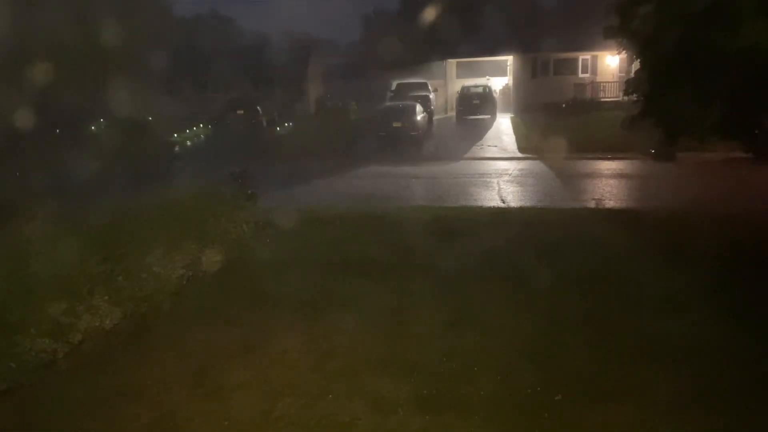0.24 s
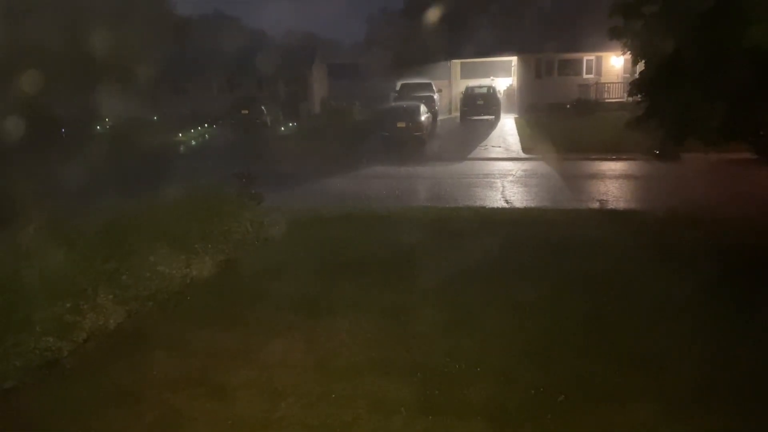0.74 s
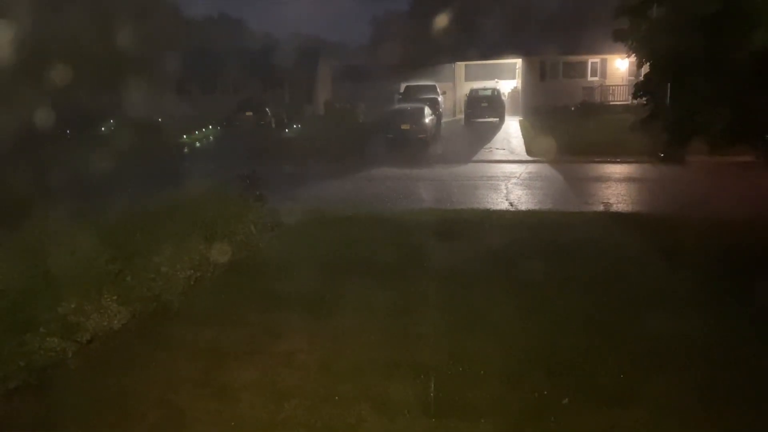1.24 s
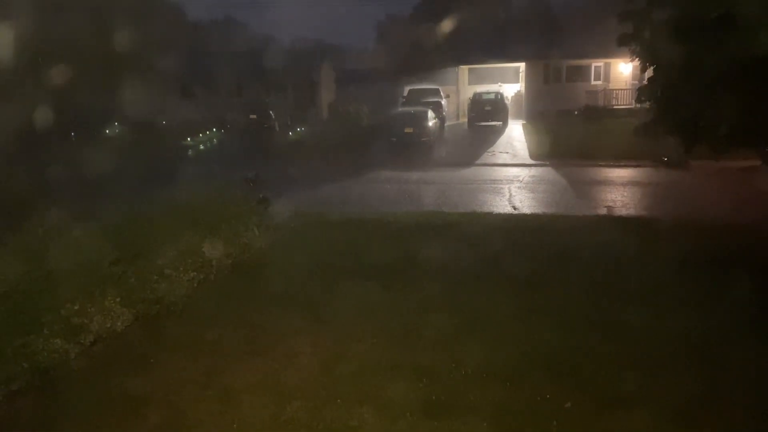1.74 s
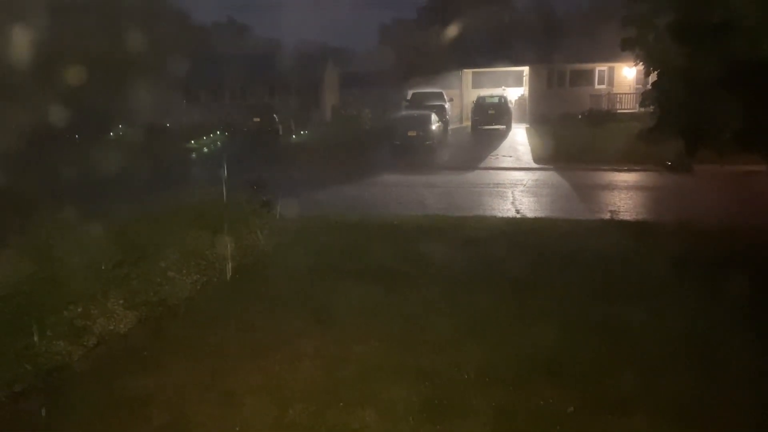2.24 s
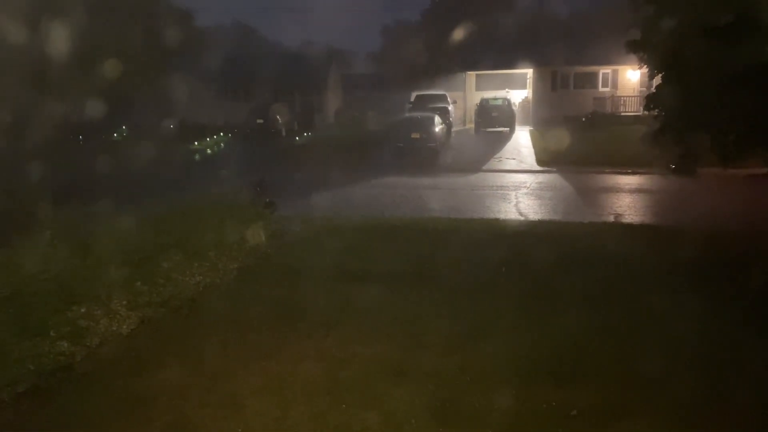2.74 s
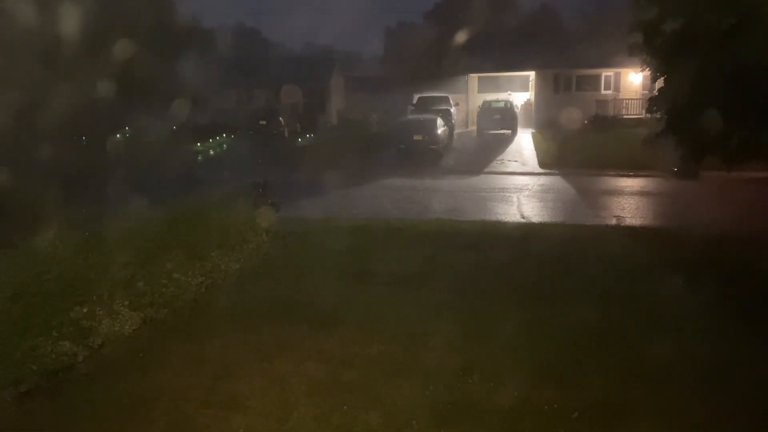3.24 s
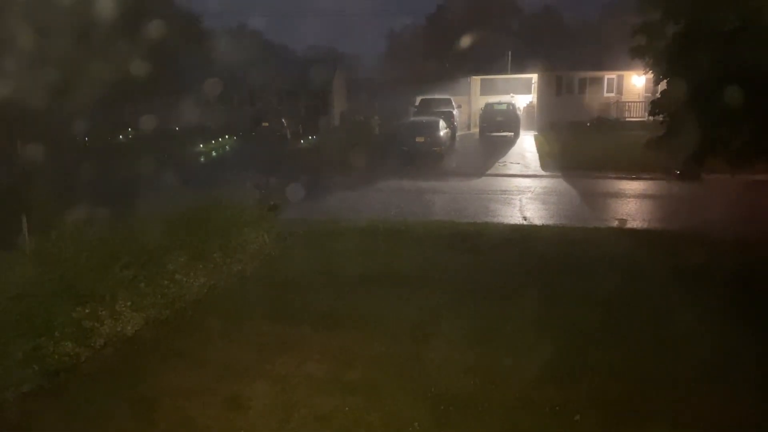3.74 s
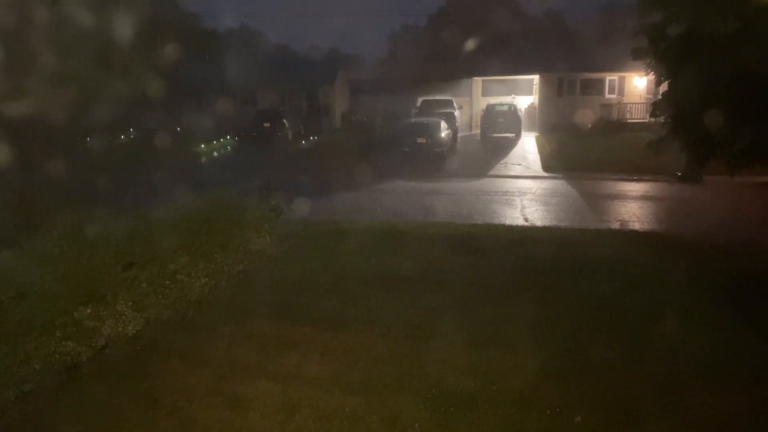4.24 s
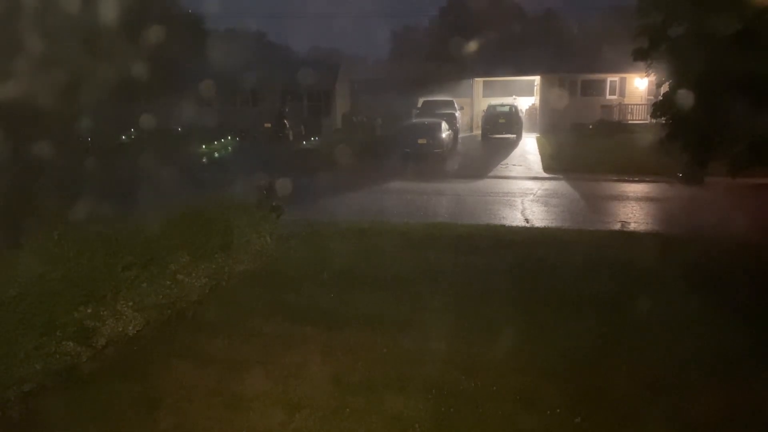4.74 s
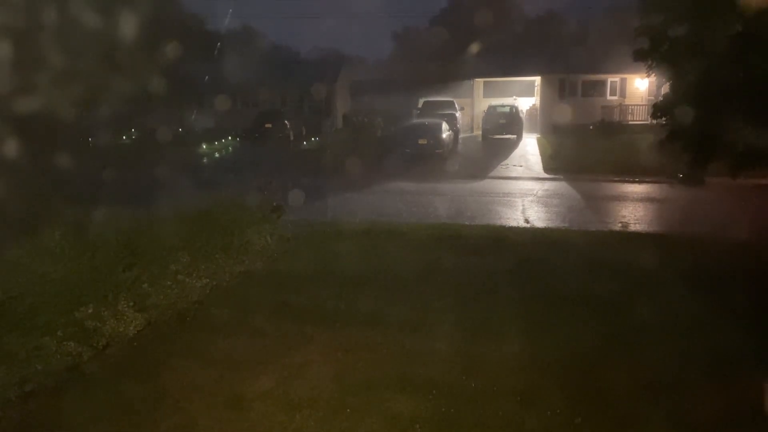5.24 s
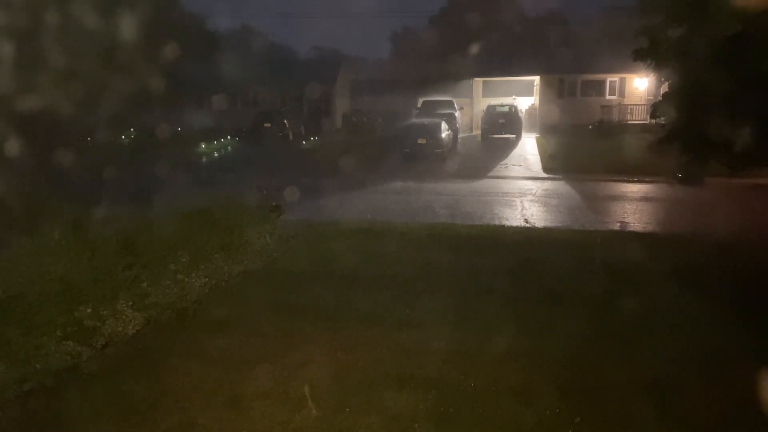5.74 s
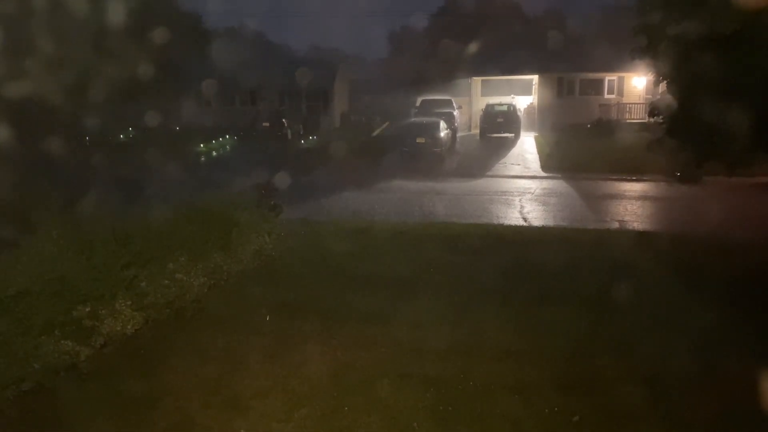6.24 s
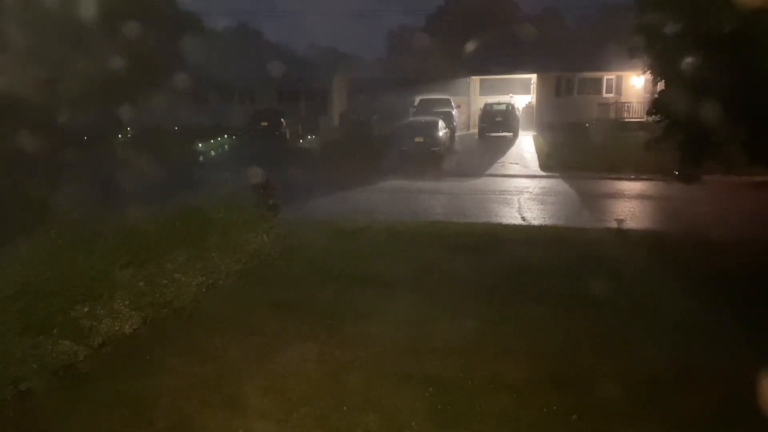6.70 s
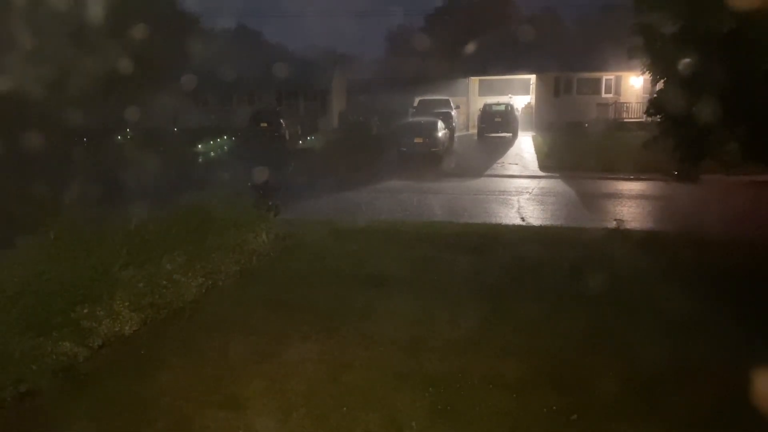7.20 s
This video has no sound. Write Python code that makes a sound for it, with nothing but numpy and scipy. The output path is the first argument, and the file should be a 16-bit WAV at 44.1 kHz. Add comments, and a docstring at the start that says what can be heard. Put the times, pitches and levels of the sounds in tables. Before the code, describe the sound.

Heavy rain at night outside a house window, heard from just inside. A continuous wash of far drops with a thin hiss of spray, nearer patter in irregular flurries, and fat drips from the eaves smacking the sill throughout. Dull plops and light ticks on the pane punctuate it. A low appliance hum stays constant beneath. Stereo phone microphone close to the window.

```python
"""Heavy, steady rain heard from indoors at a window. Far drops merge into a wash of shaped noise, with a thin hiss
of spray from one side; nearer drops ring the window in flurries and patter on several surfaces.
Close by, fat drips from the eaves smack on the sill and splash, among dull plops into standing water,
ticks on the pane, puffs of spray and a few pitched plinks, each a noise burst rung through a resonance.
In the room an appliance motor hums at twice the mains frequency over the noise rumble of its fan."""
import sys
import numpy as np
from scipy import signal
from scipy.fft import rfft, irfft
from scipy.io import wavfile
from scipy.ndimage import uniform_filter1d

SR = 44100
rng = np.random.default_rng(int(sys.argv[2]) if len(sys.argv) > 2 else 0)


def unload_wav(signal):
    """Save mono or channel-first audio to the path in sys.argv[1] as 16-bit WAV at rate SR, clipped to [-1, 1]."""
    wavfile.write(
        sys.argv[1],
        SR,
        np.round(np.clip(np.atleast_2d(signal).T, -1, 1) * 32767).astype(np.int16),
    )


N = 329272  # length in samples


def undb(db):
    """Decibels to gain."""
    return 10 ** (np.asarray(db) / 20)


def along(points, size=N):
    """A (Hz, value) table read at every Fourier bin, on a log-frequency axis."""
    hz, value = np.transpose(points)
    bins_hz = np.fft.rfftfreq(size, 1 / SR)
    return np.interp(np.log(bins_hz + 1), np.log(hz), value)


def colour(x, gain):
    """Filter by a gain for each Fourier bin."""
    return irfft(rfft(x) * gain, x.shape[-1])


def noise(channels=1):
    """White noise of 0 dB per Hz."""
    return rng.standard_normal((channels, N)) * np.sqrt(SR / 2)


def ring(x, hz, width_hz):
    """One resonance, gain 1 at its centre."""
    hz = min(hz, SR / 3)
    b, a = signal.iirpeak(hz, hz / min(width_hz, SR / 4), SR)
    return signal.lfilter(b, a, x)


def pan(lean_db):
    """Left and right gains for a left minus right level difference."""
    return undb(np.array([[1], [-1]]) * lean_db / 2)


def stereo(mid, side, alike):
    """Left and right from two unrelated sounds, with a given correlation."""
    alike = np.clip(alike, -1, 1)
    return np.sqrt((1 + alike) / 2) * mid + np.sqrt((1 - alike) / 2) * np.array([side, -side])


def walk(rate):
    """Random levels held 1 / rate s and smoothed twice; standard deviation 1."""
    k = int(SR / rate)
    steps = np.repeat(rng.standard_normal(N // k + 1), k)
    slow = uniform_filter1d(uniform_filter1d(steps, k), k)[:N]
    return slow / slow.std()


def drops(rate, scatter_db):
    """Impacts at random times, many small and a few large; 0 dB per Hz."""
    when, rank = rng.random((int(rate * N / SR), 2)).T
    sizes = undb(-scatter_db * np.log(rank + 1 / 20))
    hits = np.bincount((when * N).astype(int), sizes, N)
    return hits / hits.std() * np.sqrt(SR / 2)


def splat(hz, width_hz, swell_s, alike, room_db=-22, room_fall_s=0.28):
    """One drop: a noise burst swells, fades and lingers in the room, rung twice through one resonance."""
    t = np.arange(SR // 5) / SR
    age = t / swell_s
    burst_shape = age ** 2 * np.exp(1 - age ** 2)
    # the room's tail falls 64 dB in room_fall_s
    tail = np.minimum(age, 1) * undb(room_db - 64 * t / room_fall_s)
    shape = burst_shape + tail
    burst = rng.standard_normal((2, len(t))) * shape
    mid, side = ring(ring(burst, hz, width_hz), hz, width_hz)
    pair = stereo(mid, side, alike)
    # each side carries, on average, the energy of the envelope
    return pair * np.sqrt(np.sum(shape ** 2) / np.mean(np.sum(pair ** 2, axis=1)))


def add(out, s, sound):
    """Mix a sound in at a time."""
    start = int(np.clip(s * SR, 0, N - 1))
    out[:, start:start + sound.shape[1]] += sound[:, :N - start]


# one gust drives the rain harder: its peak, its build and die-away time, what it adds
GUST_S, GUST_WIDTH_S, GUST_DB = 1.43, 0.24, 1
# the shower strengthens very slowly and wanders about that trend
RISE_DB_PER_S, WANDER_DB, WANDER_PER_S = 0.01, 0.67, 1.5


def rain_strength():
    """Strength of the rain in dB about its mean: a slow rise, one gust and a slight wander."""
    t = np.arange(N) / SR
    gust = GUST_DB * np.exp(-((t - GUST_S) / GUST_WIDTH_S) ** 2)
    db = gust + RISE_DB_PER_S * t + WANDER_DB * walk(WANDER_PER_S)
    return db - db.mean()


# Spectrum of the far rain in the room. Each row: frequency in Hz, level in dB per Hz before flicker.
WASH_SPECTRUM = [(120, -112), (290, -80.5), (450, -84.5), (750, -82), (880, -84), (1200, -85),
                 (1520, -87.5), (1720, -86), (1900, -86), (2400, -90), (3200, -92), (5000, -98.5),
                 (6300, -99.3), (7800, -126)]
# How alike the rain is at the two microphones. Each row: frequency in Hz, correlation from -1 to 1.
LEFT_RIGHT_LIKENESS = [(300, -0.61), (450, 0.32), (750, -0.38), (1130, -0.55), (1480, -0.088), (1850, -0.6),
                       (2150, 0.56), (2700, 0.72), (3200, 0.32), (4500, 0.53), (6000, 0.23)]
# Where the wash leans. Each row: frequency in Hz, left minus right in dB.
WASH_LEAN = [(400, -0.5), (600, -2), (880, .5), (1250, -0.5), (2000, 1.5), (3000, 2.5), (4800, 3.5),
             (6300, -0.5)]


def wash(flow_db, flicker_db=1.0):
    """Far drops merge into a roar whose low and high registers waver on their own."""
    alike = np.clip(along(LEFT_RIGHT_LIKENESS), -1, 1)
    mid, side = colour(noise(channels=2), np.sqrt([(1 + alike) / 2, (1 - alike) / 2]))
    roar = colour(np.array([mid + side, mid - side]), undb(along(WASH_SPECTRUM)) * pan(along(WASH_LEAN)))
    low = signal.sosfiltfilt(signal.butter(2, 1900, fs=SR, output="sos"), roar)
    high = roar - low
    return low * undb(flow_db + flicker_db * walk(14)) + high * undb(flow_db + flicker_db * walk(21.85))


# Spectrum of the fine spray. Each row: frequency in Hz, level in dB per Hz before flicker.
HISS_SPECTRUM = [(4500, -118), (6000, -103), (7000, -98.6), (8400, -102.8), (10800, -103.4),
                 (13000, -107.8), (15500, -112)]
HISS_LAG_S = .000272


def hiss(flow_db, flicker_db=1.4, above_11k_db=0.5):
    """Fine spray off to one side reaches the left microphone a little later; its level flickers quickly."""
    lag = np.exp(-2j * np.pi * np.fft.rfftfreq(N, 1 / SR) * HISS_LAG_S)
    spray = noise() * undb(flow_db + flicker_db * walk(60))
    top = signal.sosfiltfilt(signal.butter(4, 11000, "high", fs=SR, output="sos"), spray)
    spray = spray - top + top * undb(above_11k_db * walk(55))
    return colour(spray, undb(along(HISS_SPECTRUM)) * np.array([lag, np.ones_like(lag)]))


# Resonances of the window and its recess. Each row: centre in Hz, width in Hz, level at the top in dB per Hz
# before flurries, left minus right in dB, left-right correlation.
WINDOW_RESONANCES = [(371.5, 42, -84, 6, 0.8), (651, 56, -85, -3, 0.97), (710.6, 30, -88, -2, .6),
                     (987, 49, -85, -4, -0.26), (1160, 79, -85.5, -1.5, -0.63), (1298, 85, -82, -4.5, 0.15),
                     (1662, 126, -85.5, -3, -0.56), (1924, 70, -89.5, 13, -0.058), (2201, 55, -86, 4, 0.8),
                     (2308, 73, -88, 5, 0.21), (2787, 67, -90, 11, 1), (4840, 72, -95.5, 7, 1)]


def window(flow_db, rate=200, scatter_db=3.0, flurry_db=1.3, drift=.008):
    """Drops ring the resonances of the window in irregular flurries; the pitch of each ring wanders a little."""
    out = np.zeros((2, N))
    for hz, width_hz, db, lean_db, alike in WINDOW_RESONANCES:
        hits = stereo(drops(rate, scatter_db), drops(rate, scatter_db), alike) * undb(flurry_db * walk(13))
        # reading the ring at an uneven pace bends its pitch
        clock = np.cumsum(1 + drift * walk(9))
        rung = ring(ring(hits, hz, width_hz), hz, width_hz)
        bent = np.array([np.interp(clock, np.arange(N), side) for side in rung])
        out += bent * undb(db) * pan(lean_db)
    return out * undb(flow_db)


# Surfaces that nearer drops patter on. Each row: centre in Hz, width in Hz, drops per s,
# level in dB rms before flurries.
PATTER_SURFACES = [(1360, 490, 90, -70.5), (2500, 620, 85, -63.3), (4160, 1350, 60, -69.5),
                   (6370, 520, 41, -74.5)]


def patter(flow_db, scatter_db=3.1, swell_s=0.007, swell_octaves=0.73, flurry_db=1.65, count=10):
    """Nearer drops fall in flurries on spots of each surface, each spot with its own ring and splash length."""
    out = np.zeros((2, N))
    for hz, width_hz, rate, db in PATTER_SURFACES:
        surface = np.zeros((2, N))
        for spot_hz in hz * 2 ** np.linspace(-.2, .22, count):
            alike = np.interp(spot_hz, *np.transpose(LEFT_RIGHT_LIKENESS))
            hits = drops(rate / count, scatter_db)
            length_s = swell_s * 2 ** (swell_octaves * rng.uniform(-1.02, 1))
            spot = splat(spot_hz, width_hz, length_s, alike) / np.sqrt(length_s)
            surface += signal.oaconvolve(hits[None], spot, axes=1)[:, :N]
        out += surface * undb(db) / surface.std()
    return out * undb(flow_db + flurry_db * walk(12))


HUM_WAVER_DB = .15
# a momentary thinning of the low hum: when, how long, how deep
THIN_S, THIN_WIDTH_S, THIN_DB = 2.328, .012, -9
# Fan rumble in the room. Each row: frequency in Hz, level in dB per Hz before the lean.
FAN_RUMBLE = [(20, -104), (30, -94), (40, -83), (50, -78.5), (61, -72.5), (70, -73.5), (100, -71.5),
              (150, -70), (200, -80.5), (235, -78.5), (295, -83), (340, -99), (600, -115)]
# Motor lines, shaft turn and magnetic hum. Each row: frequency in Hz, level in dB rms before waver and thinning,
# left minus right in dB.
MOTOR_LINES = [(58.7, -61, -2), (120.03, -41.3, -2.6)]


def appliance(rumble_lean_db=-3.0):
    """A motor hums, wavering faintly; its fan's rumble has one waveform at both microphones."""
    t = np.arange(N) / SR
    out = colour(noise(), undb(along(FAN_RUMBLE))) * pan(rumble_lean_db)
    thin_db = THIN_DB * np.exp(-((t - THIN_S) / THIN_WIDTH_S) ** 2)
    for hz, db, lean_db in MOTOR_LINES:
        tone = np.sqrt(2) * np.sin(2 * np.pi * (hz * t + rng.random()))
        out = out + tone * undb(db + thin_db + HUM_WAVER_DB * walk(3.17)) * pan(lean_db)
    return out


# lesser drips fall at random, anywhere along the sill; their level is before DRIP_DB
SMALL_DRIPS_PER_S, SMALL_DRIP_DB, SMALL_DRIP_SPREAD_DB = 7, -48, 6.5
SILL_LOW_HZ, SILL_HIGH_HZ = 2050, 2950


def small_drips(spread_s=.007, lean_spread_db=7):
    """Lesser drips at random moments, as rows with the columns of the fat drips."""
    when, size, place, soft, side = rng.random((int(SMALL_DRIPS_PER_S * N / SR), 5)).T
    db = SMALL_DRIP_DB + SMALL_DRIP_SPREAD_DB * (size - .5)
    hz = SILL_LOW_HZ + place * (SILL_HIGH_HZ - SILL_LOW_HZ)
    return list(zip(when * N / SR, db, hz, spread_s * (.5 + soft), lean_spread_db * (side - .5)))


DRIP_WIDTH_HZ = 770
# the water lands again a moment later; the rebound and splash levels are relative to the drip
REBOUND_S, REBOUND_DB, SPLASH_DB = .002, -1.5, -15.5
# droplets fall back: how long they keep landing, level relative to the drip, how fast they weaken
DROPLET_SPAN_S, DROPLET_DB, DROPLET_FADE_DB_PER_S = .07, -8, 93


def drip(hz, spread_s, count=4):
    """A drip smacks, lands again, splashes and drops a few droplets; returns (on the sill, in the air)."""
    sill, air = np.zeros((2, 2, SR // 3))
    smack = splat(hz, DRIP_WIDTH_HZ, swell_s=0.0012, alike=0.68, room_db=-7.0, room_fall_s=0.099)
    add(sill, 0, smack)
    rebound = splat(hz, DRIP_WIDTH_HZ, swell_s=spread_s, alike=0.82, room_db=-10, room_fall_s=0.16)
    add(sill, REBOUND_S, undb(REBOUND_DB) * rebound)
    for late, place in rng.random((count, 2)):
        s = 2 * spread_s + late * DROPLET_SPAN_S
        droplet_hz = hz * 2 ** (.5 * (place - .5))
        droplet = splat(droplet_hz, DRIP_WIDTH_HZ, swell_s=.002, alike=.6, room_db=-14, room_fall_s=.12)
        add(sill, s, undb(DROPLET_DB - DROPLET_FADE_DB_PER_S * s) * droplet)
    splash = splat(hz=3830, width_hz=1400, swell_s=0.0079, alike=0.45, room_db=-6, room_fall_s=0.17)
    add(air, 0, undb(SPLASH_DB) * splash)
    return sill, air


DRIP_DB = -7.5  # trim of all drips
# The fattest drips on the sill. Each row: start in seconds, level in dB before the trim, ring in Hz,
# how long the water spreads in seconds, left minus right in dB.
FAT_DRIPS = [(0.0004, -34.5, 2150, .003, 2), (0.070, -45, 2360, .005, -3), (0.247, -40, 2630, .004, -2),
             (0.953, -43, 2350, 0.0036, 0), (1.128, -42, 2330, .004, 0), (1.190, -45, 2600, 0.0053, -2),
             (1.218, -43, 2250, .004, 2), (1.255, -46, 2220, 0.0034, 0), (1.4365, -40, 2330, .007, 0),
             (1.5125, -36.5, 2370, .0035, -1), (1.8705, -40, 2350, 0.0018, 0),
             (2.331, -38.5, 2660, 0.0053, 0), (2.539, -44, 2440, 0.0083, 0), (2.7407, -43, 2560, .004, 2),
             (2.8519, -40, 2380, 0.005, -1), (3.307, -44, 2320, .004, 0), (4.078, -45, 2090, .003, 0),
             (4.2208, -39, 2330, .002, 0), (4.2423, -39, 2160, 0.0046, 3), (4.323, -42.5, 2450, .005, 0),
             (4.5005, -40.5, 2220, 0.0042, 0), (4.5535, -37.5, 2700, 0.0046, 1),
             (4.626, -44, 2130, 0.0065, -2), (5.068, -43, 2530, 0.0046, -1), (5.5945, -40, 2230, 0.0047, 2),
             (6.1375, -35.2, 2780, .0046, 3), (6.163, -44, 2450, 0.0053, -2), (6.257, -41, 2110, .0033, 0),
             (6.2816, -42, 2500, 0.0068, 1), (6.557, -41, 2210, .003, 2), (6.734, -44, 2290, .004, 0),
             (6.8264, -41, 2790, .005, 5), (7.074, -36, 2200, .0034, 0), (7.1904, -41, 2250, .004, 0),
             (7.2365, -39.5, 2500, .0055, 0)]


def eaves_drips():
    """Fat and lesser drips from the eaves; wherever one lands, the sill adds its own broad resonance."""
    air, sill = np.zeros((2, 2, N))
    for s, db, hz, spread_s, lean_db in list(FAT_DRIPS) + small_drips():
        size = undb(db + DRIP_DB) * pan(lean_db)
        landing, splash = drip(hz, spread_s)
        add(sill, s, size * landing)
        add(air, s, size * splash)
    return air + ring(sill, hz=2400, width_hz=1900) * pan(lean_db=0.5)


PLOP_DB = -6  # trim of all plops
# Duller plops into standing water. Each row: start in seconds, level in dB before the trim, ring in Hz,
# width in Hz, swell in seconds.
WATER_PLOPS = [(0.001, -35, 1410, 600, .007), (0.01, -42, 1300, 400, 0.0092), (0.587, -45, 1300, 220, .007),
               (0.645, -46, 1300, 220, .007), (1.146, -43, 1290, 220, .007),
               (1.258, -41, 1280, 220, 0.0065), (1.513, -43.5, 1320, 260, 0.0083),
               (2.168, -45.5, 1300, 240, 0.011), (3.200, -45, 1300, 220, .007),
               (3.957, -44.5, 1350, 240, .007), (4.609, -43, 1550, 550, 0.0092),
               (4.625, -46, 1300, 400, 0.0078)]


def plops():
    """Drops into standing water give a dull, low ring, leaning right."""
    out = np.zeros((2, N))
    for s, db, hz, width_hz, swell_s in WATER_PLOPS:
        add(out, s, undb(db + PLOP_DB) * splat(hz, width_hz, swell_s, alike=-0.11) * pan(lean_db=-2.5))
    return out


TICK_DB, FRAME_DB = -12.7, -4  # trim of all ticks; frame knock relative to the glass
# Sharp ticks on the pane. Each row: start in seconds, level in dB before the trim, centre in Hz, width in Hz.
PANE_TICKS = [(0.260, -54, 10500, 3500), (0.757, -47, 4200, 1600), (1.018, -52, 6500, 2400),
              (1.189, -36.5, 5000, 1350), (1.199, -43.5, 4600, 1200), (1.865, -52, 6800, 2800),
              (2.162, -45.5, 4500, 1900), (2.243, -51, 6300, 2400), (2.630, -49, 4300, 1400),
              (2.935, -49, 7260, 2600), (3.162, -54, 7650, 2000), (3.639, -46, 7640, 2600),
              (3.916, -45.5, 6600, 2900), (4.220, -47, 4300, 1700), (4.874, -49, 6960, 2400),
              (5.942, -47, 4300, 1500), (6.617, -47, 4850, 700), (7.071, -48, 3800, 1200),
              (7.192, -47.5, 4000, 1500)]


def ticks():
    """Each drop on the pane ticks the glass and also knocks the window frame."""
    out = np.zeros((2, N))
    for s, db, hz, width_hz in PANE_TICKS:
        glass = splat(hz, width_hz, swell_s=0.0084, alike=0.55, room_db=-2, room_fall_s=0.1)
        frame = splat(hz=2850, width_hz=1300, swell_s=0.011, alike=0.76, room_db=1, room_fall_s=0.12)
        add(out, s, undb(db + TICK_DB) * (glass + undb(FRAME_DB) * frame))
    return out


SPRAY_DB = -13  # trim of all puffs
# Spray blown against the pane. Each row: start in seconds, level in dB before the trim, centre in Hz,
# swell in seconds.
SPRAY_PUFFS = [(1.375, -45, 3900, 0.041), (2.955, -47, 4600, .016), (4.452, -46, 4300, .018)]


def sprays():
    """Puffs of spray brush the glass as broad, slower bursts."""
    out = np.zeros((2, N))
    for s, db, hz, swell_s in SPRAY_PUFFS:
        add(out, s, undb(db + SPRAY_DB) * splat(hz, width_hz=3500, swell_s=swell_s, alike=.6, room_db=-5))
    return out


# Small pitched plinks in a puddle. Each row: start in seconds, level in dB, ring in Hz.
PUDDLE_PLINKS = [(5.595, -50, 2425), (5.797, -47, 2424), (5.799, -51, 1335), (6.160, -51, 2270)]


def plinks():
    """A very narrow resonance gives each plink its pitch."""
    out = np.zeros((2, N))
    for s, db, hz in PUDDLE_PLINKS:
        add(out, s, undb(db) * splat(hz, width_hz=15, swell_s=0.0071, alike=.8))
    return out


def scene(far_share=0.45, near_share=1.2):
    """The strength of the rain drifts a little; the near patter follows it more than the far wash."""
    flow_db = rain_strength()
    far = wash(far_share * flow_db) + hiss(far_share * flow_db)
    near = window(flow_db) + patter(near_share * flow_db)
    close_drops = eaves_drips() + plops() + ticks() + sprays() + plinks()
    return far + near + appliance() + close_drops


TOP_HZ = 15650


def record(dry):
    """The phone that listens cuts the top with a steep low-pass."""
    return signal.sosfilt(signal.ellip(10, .1, 80, TOP_HZ, fs=SR, output="sos"), dry)


dry = scene()
out = record(dry)
unload_wav(out)
```